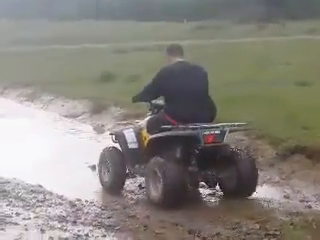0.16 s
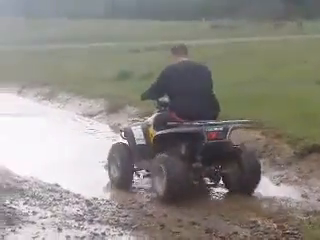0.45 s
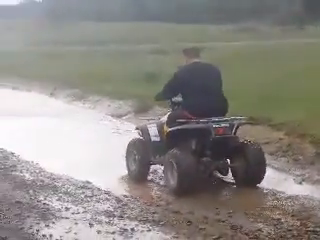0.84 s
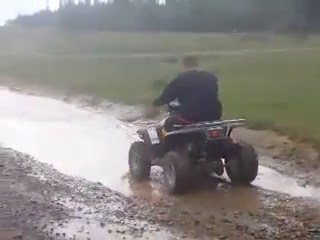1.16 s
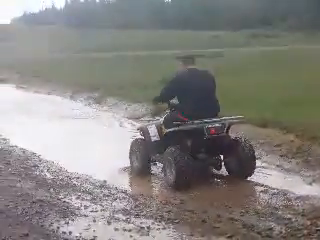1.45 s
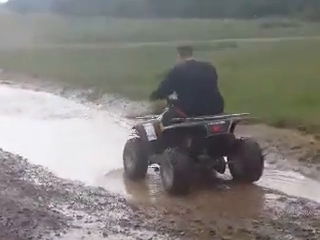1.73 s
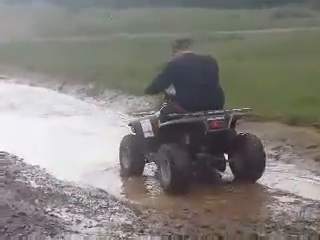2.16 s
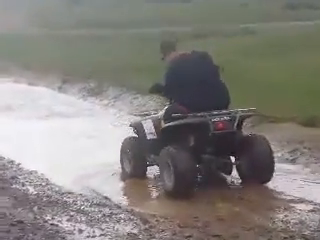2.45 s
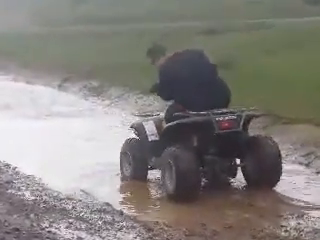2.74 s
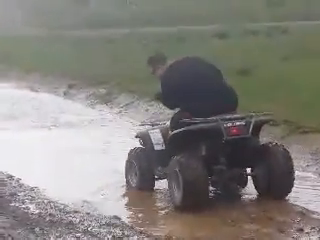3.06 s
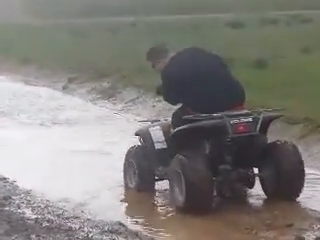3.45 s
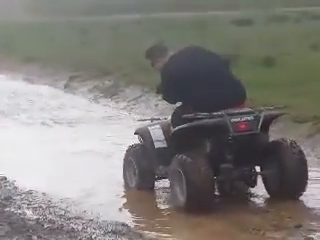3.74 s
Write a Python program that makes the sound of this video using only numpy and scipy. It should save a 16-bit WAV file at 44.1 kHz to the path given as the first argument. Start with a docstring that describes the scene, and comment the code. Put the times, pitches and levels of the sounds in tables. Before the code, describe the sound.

Small off-road engine idling close by, low exhaust pulses under bright rattling metal; it rises past a tiny splash, sags, and sputters at the end, while wind rumbles on the left microphone and gusts briefly right.

```python
"""A single-cylinder quad bike idles at the edge of a puddle: each firing sends two puffs through the muffler,
and blows of the valve gear and casing ring metal at fixed places in the cycle. Wind, as coloured noise,
buffets the left microphone port all the time and the right one in short gusts; a hollow note drifts at the left.
The engine speeds up with some hard firings, cracks of noise, and a burst of noise makes a small splash.
It drops back; a dry decaying tone ticks on the left, then three sputters crack and ring the metal."""
import sys
import numpy as np
from scipy import signal
from scipy.fft import rfft, irfft
from scipy.io import wavfile
from scipy.ndimage import uniform_filter1d

SR = 44100
rng = np.random.default_rng(int(sys.argv[2]) if len(sys.argv) > 2 else 0)


def pcm_store(signal):
    """Save signal as 16-bit PCM."""
    levels = np.round(np.clip(np.atleast_2d(signal), -1, 1) * 32767)
    wavfile.write(sys.argv[1], SR, levels.astype(np.int16).T)


N = 171990
T = np.arange(N) / SR


def amp(db):
    """Decibels to gain."""
    return 10 ** (np.asarray(db) / 20)


def unit(x):
    """Scales to an rms of one."""
    return x / np.sqrt(np.mean(x ** 2) + 1e-20)


def curve(rows, axis=1):
    """One column of a time table, interpolated at every sample."""
    rows = np.array(rows)
    return np.interp(T, rows[:, 0], rows[:, axis])


def colour(x, points, law=amp):
    """Zero-phase filter; the spectrum table is interpolated over log frequency."""
    hz, value = np.transpose(points)
    bins_hz = np.fft.rfftfreq(2 * N, 1 / SR)
    gain = law(np.interp(np.log(bins_hz + 1), np.log(hz), value))
    return irfft(rfft(x, 2 * N) * gain)[:N]


def resonate(x, hz, width_hz):
    """A fixed or moving resonance of gain one: shift to 0 Hz, one-pole lowpass, shift back."""
    turn = np.exp(2j * np.pi * np.cumsum(hz * np.ones(N)) / SR)
    pole = np.exp(-np.pi * abs(width_hz) / SR)
    smooth = signal.lfilter([1 - pole], [1, -pole], x / turn + 1e-18)
    return 2 * (turn * smooth).real


def ring(blows, modes):
    """Metal modes struck by a train of blows."""
    return sum(amp(db) * unit(resonate(blows, hz, width_hz)) for hz, width_hz, db in modes)


GRIT_SHARE = .55  # of the driving power


def wander(blows, grit, rows, width_hz):
    """A steep resonance whose pitch and level drift, struck by blows and shaken by grit."""
    hz = curve(rows)
    drive = np.sqrt(1 - GRIT_SHARE) * unit(blows) + np.sqrt(GRIT_SHARE) * unit(grit)
    note = resonate(resonate(drive, hz, width_hz), hz, width_hz)
    return amp(curve(rows, axis=2)) * unit(note)


def wobble(seconds):
    """Noise of rms one, smoothed twice over a window."""
    n = max(int(seconds * SR), 1)
    return unit(uniform_filter1d(uniform_filter1d(rng.standard_normal(N), n), n))


def add(mix, s, sound):
    """Adds a sound at a time, cut to fit."""
    at = int(round(s * SR))
    part = mix[max(at, 0):max(at + len(sound), 0)]
    part += sound[max(-at, 0):][:len(part)]


# Engine speed. Each row: time in seconds, firings per second.
ENGINE_SPEED = [(0.0, 12.943), (0.5, 13.071), (0.85, 12.44), (1.0, 13.243), (1.2, 14.596), (1.5, 15.835),
                (1.9, 16.832), (2.3, 19.19), (2.68, 21.41), (2.88, 18.116), (3.07, 17.445), (3.2, 15.515),
                (3.45, 14.029), (3.62, 12.625), (3.68, 14.916), (3.76, 20.874), (3.9, 18.19)]
START_CYCLES = .721


def cycles():
    """Engine cycles at every sample: the running integral of speed, one firing per cycle."""
    return np.cumsum(curve(ENGINE_SPEED)) / SR - START_CYCLES


def moments(share, shift=0):
    """Times at which the engine passes a place in its cycle; -1 when outside the scene."""
    return np.interp(np.arange(-1, 64) + share, cycles() - shift, T, left=-1, right=-1)


# Strength of the firings. Each row: time in seconds, relative level in dB.
FIRING_EFFORT = [(0, -6), (.9, -5), (1.2, -4), (1.8, -5), (2.6, -2.5), (2.73, -6), (2.85, -14.5),
                 (3.1, -15.5), (3.43, -10.5), (3.58, -9), (3.66, -3), (3.73, -7.5), (3.78, -5),
                 (3.84, -9.5)]


def effort_db():
    """Firing strength at every sample."""
    return curve(FIRING_EFFORT)


# Exhaust puffs of one cycle. Each row: place as a share of the cycle, relative level in dB, sigma in seconds.
EXHAUST_PUFFS = [(-.004, 0, .00068), (.146, -3.2, .00082)]
# Muffler resonances. Each row: frequency in Hz, width in Hz, relative level in dB.
MUFFLER_MODES = [(116.2, 15.7, -2.5), (177.6, 28, -19.5), (217.6, 71, -8), (266.6, 30, -12),
                 (302, 17, -16.5)]
EXHAUST_DB, FIRING_SPREAD_DB = -19, 1.36
EXHAUST_LEFT_DB, EXHAUST_LEFT_LAG_S = 1, 0.00072


def exhaust():
    """Two Gaussian puffs per firing ring the muffler."""
    t = np.arange(-256, 256) / SR
    flow = np.zeros(N)
    strength = amp(-FIRING_SPREAD_DB * rng.standard_normal(len(moments(0))))
    for share, db, sigma_s in EXHAUST_PUFFS:
        puff = -amp(db) * np.exp(-.5 * (t / sigma_s) ** 2)
        for s, size in zip(moments(share), strength):
            add(flow, s + t[0], size * puff)
    flow = flow - uniform_filter1d(flow, SR // 40)  # remove the slow mean
    flow = flow * amp(effort_db())
    muffled = sum(amp(db) * resonate(flow, hz, width_hz) for hz, width_hz, db in MUFFLER_MODES)
    right = amp(EXHAUST_DB) * unit(muffled)
    left = amp(EXHAUST_LEFT_DB) * np.interp(T - EXHAUST_LEFT_LAG_S, T, right)
    return np.array([left, right])


# Knocks of one cycle. Each row: place as a share of the cycle, shift in share per extra firing per second,
# decay in seconds, share that follows the firing strength, then relative levels in dB
# into casing, ping, rolling ring, whir and fizz.
KNOCKS = [(-.035, -.009, 0.0076, 0.75, -7, 0.5, -6, -28, 6),
          (-.022, 0.0029, 0.0065, 1, -2.5, -6, -3, 4, -9.5), (.135, 0, 0.0056, 0.4, -2, 3, -6.5, 4, -5),
          (.225, -.003, 0.0014, .1, -14.5, -6, -9, 2, -8), (.265, 0, 0.0066, 0.19, -3, -27, 0.5, 5, -0.5),
          (.345, -.003, 0.018, 0.16, -9, -7, 0, 4, -2), (.555, -.001, 0.0065, 0.69, -3, -2.5, -11, 1, -6),
          (.62, -.009, 0.024, 0.34, -13, 2, 0, 5.5, -9)]
MIDDLE_SPEED_HZ = 15  # firings per second with no shift
KNOCK_RISE_S, KNOCK_SPREAD_DB, KNOCK_JITTER_S = 0.0017, 1.2, .0005
GRAIN_DB, GRAIN_S = 1, 0.0019
SHAKE_FLOOR = .27  # steady shaking between knocks
# The clatter hushes while the piston compresses.
HUSH_PLACE, HUSH_HALF_WIDTH, HUSH_DB = .87, .07, -4  # shares of the cycle, dB


def knocks():
    """The blows, and the envelope of gritty shaking that follows them, for each ringing part."""
    t = np.arange(SR // 16) / SR
    effort = effort_db()
    faster = curve(ENGINE_SPEED) - MIDDLE_SPEED_HZ
    blows, power = np.zeros((2, 5, N))
    for share, shift, decay_s, follows, *parts_db in KNOCKS:
        times = moments(share, shift * faster)
        fall = np.exp(-np.maximum(t - KNOCK_RISE_S, 0) / decay_s)
        burst = np.minimum(t / KNOCK_RISE_S, 1) * fall
        for s, (late, hard) in zip(times, rng.standard_normal((len(times), 2))):
            at = s + KNOCK_JITTER_S * late
            change_db = KNOCK_SPREAD_DB * hard + follows * np.interp(s, T, effort)
            for part, size in enumerate(amp(np.array(parts_db) + change_db)):
                add(power[part], at, (size * burst) ** 2)
                add(blows[part], at + KNOCK_RISE_S, np.array([size]))
    hush_db = HUSH_DB * np.exp(-((cycles() % 1 - HUSH_PLACE) / HUSH_HALF_WIDTH) ** 2)
    shake = np.sqrt(power + SHAKE_FLOOR ** 2) * amp(hush_db + GRAIN_DB * wobble(GRAIN_S))
    return blows, shake


# Each row: time in seconds, relative level of the clatter in dB, relative level of its treble in dB.
CLATTER_LEVELS = [(0, 0, 0.5), (.3, 1, 1), (.6, 1, 1.5), (.9, 1.5, -2), (1.2, 1.5, -0.5), (1.5, 2.5, 1.5),
                  (1.8, 3.5, 1.5), (2.05, 1.5, 0), (2.35, 3, 3), (2.7, 3.5, 0), (2.9, 1.5, 0.5),
                  (3.1, 1.5, 1), (3.35, 1, -2.5), (3.57, -2.5, -5.5), (3.72, 0, -2.5), (3.9, 4, 2)]
# Spectra of casing and fizz. Each row: frequency in Hz, relative level in dB.
CASING_SPECTRUM = [(300, -35), (700, -8.5), (1100, -6), (1400, -5), (1700, -6.5), (1950, 5.5), (2200, -6),
                   (2500, 1), (3100, -1), (3550, -7), (4050, -6.5), (4500, -11), (4900, -8.5), (5700, -15),
                   (9000, -25.5)]
FIZZ_SPECTRUM = [(3000, -12), (5700, -19.5), (6600, -4), (7500, 0), (8700, -5.5), (10000, -9),
                 (11500, -16.5), (14500, -18)]
CASING_DB, FIZZ_DB = -28.5, -27
# Metal modes, then thin rings. Each row: frequency in Hz, width in Hz, level in dB.
METAL_MODES = [(1564, 6.7, -49), (2010, 39, -48.5), (2502, 14, -38), (2770, 8.3, -42.5), (2870, 15, -36),
               (4372, 18, -45), (4850, 27, -48.5)]
THIN_MODES = [(1971, 11, -39.5), (3862, 13.6, -40.5)]
# Each row: time in seconds, gain of the thin rings in dB.
THIN_GAIN = [(0, -20), (.6, 1), (1.1, -8), (1.7, -3.5), (2.6, 0), (3, 8.5), (3.5, 4.5), (3.9, -8)]
# Wandering rings: main ping, rolling ring, higher whir. Each row: time in seconds, pitch in Hz, level in dB.
PING_TRACK = [(0, 1990, -36), (.6, 2030, -36), (1.2, 1980, -32), (1.8, 1980, -32), (2.6, 1940, -37),
              (3, 1960, -32), (3.5, 1950, -38), (3.9, 2020, -29)]
ROLLING_TRACK = [(0, 2530, -50), (.6, 2730, -37), (1.2, 2786, -29.5), (1.55, 2750, -34), (1.85, 2860, -32),
                 (2.2, 2575, -32), (2.75, 2640, -29.5), (3, 2820, -33.5), (3.55, 2720, -35.5),
                 (3.9, 2780, -29.5)]
WHIR_TRACK = [(0, 3920, -34.5), (.25, 3940, -34.5), (.6, 3930, -35.5), (.9, 4050, -48), (1.2, 4100, -51),
              (1.42, 3900, -36), (1.9, 4070, -47), (2.5, 4000, -42), (3.1, 3900, -43), (3.55, 3780, -47),
              (3.9, 3880, -32.5)]
PING_WIDTH_HZ, ROLLING_WIDTH_HZ, WHIR_WIDTH_HZ = 190, 260, 210


def clatter():
    """Knocks locked to the cycle shake the casing and ring the metal; two paths with separate grit."""
    blows, shake = knocks()
    body = unit(amp(curve(CLATTER_LEVELS)))
    treble = unit(amp(curve(CLATTER_LEVELS, axis=2)))
    paths = []
    for grit in rng.standard_normal((2, 5, N)) * shake:
        (_, casing), ping, rolling, whir, (_, fizz) = zip(blows, grit)
        path = body * amp(CASING_DB) * unit(colour(casing, CASING_SPECTRUM))
        path += treble * amp(FIZZ_DB) * unit(colour(fizz, FIZZ_SPECTRUM))
        path += wander(*ping, PING_TRACK, PING_WIDTH_HZ)
        path += wander(*rolling, ROLLING_TRACK, ROLLING_WIDTH_HZ)
        path += wander(*whir, WHIR_TRACK, WHIR_WIDTH_HZ)
        paths.append(path)
    metal = body * ring(blows[0], METAL_MODES)
    thin = amp(curve(THIN_GAIN)) * ring(blows[3], THIN_MODES)
    return np.array([paths[0] + metal + thin, paths[1]])


# Left port against right. Each row: frequency in Hz, level in dB.
LEFT_SPECTRUM = [(500, -2), (1200, -6), (1550, -3), (2000, -8), (3000, -7), (4300, -2), (5300, -2),
                 (6300, -9), (7500, -19), (10000, -19), (11500, -38)]
# Likeness of the ports. Each row: frequency in Hz, likeness from 0 to 1.
PORT_LIKENESS = [(500, 0.4), (1300, 0.27), (2000, 0.32), (2900, 0.22), (4000, 0.35), (8000, 0.29)]
LEFT_LAG_SAMPLES = 64


def ports(right, other):
    """The left channel carries the engine metal 64 samples late, duller and partly by other paths."""
    shared = colour(right, PORT_LIKENESS, lambda c: np.clip(c, 0, 1))
    separate = colour(other, PORT_LIKENESS, lambda c: np.sqrt(1 - np.clip(c, 0, 1) ** 2))
    left = colour(shared + separate, LEFT_SPECTRUM)
    return np.array([np.pad(left, (LEFT_LAG_SAMPLES, 0))[:N], right])


# Wind on the left port. Each row: time in seconds, level in dB.
LEFT_WIND = [(0, -11.5), (.17, -12), (.35, -12), (.6, -12.5), (.9, -16), (1.1, -14.5), (1.4, -15),
             (1.8, -16.5), (2.2, -13.5), (2.64, -17.5), (2.7, -9), (3.2, -10), (3.35, -12), (3.55, -9.5),
             (3.72, -14), (3.9, -10)]
# Gusts on the right port. Each row: centre in seconds, half length in seconds, level in dB.
RIGHT_GUSTS = [(0.017, 0.0045, -12.5), (0.319, 0.062, -19), (0.458, .03, -23), (0.55, 0.03, -17.5),
               (1.033, 0.031, -20.5), (1.12, 0.0046, -12.5), (2.754, 0.039, -26), (3.104, 0.054, -27),
               (3.25, 0.054, -12)]
# Spectra of buffeting and brighter flutter. Each row: frequency in Hz, relative level in dB.
BUFFET_SPECTRUM = [(20, -24.5), (45, -10), (80, -0.5), (160, 0.5), (260, -5), (400, -14), (600, -25),
                   (1000, -32), (1600, -41), (4000, -77)]
FLUTTER_SPECTRUM = [(120, -27), (300, 2.5), (480, 1.5), (750, -7), (1200, -28.5), (3000, -81)]
RIGHT_CALM_DB = -30
LUMP_DB, LUMP_S = 1, 0.016
FLUTTER_DB, FLUTTER_EXPONENT = -10.5, 1.37  # flutter grows faster than the wind
FLUTTER_LUMP_DB, FLUTTER_LUMP_S = 3.9, 0.0053


def wind():
    """Lumpy turbulence, unrelated at the two ports, brighter when it blows harder."""
    gusts = sum(amp(db) * np.exp(-((T - s) / half_s) ** 2) for s, half_s, db in RIGHT_GUSTS)
    out = []
    for level in amp(curve(LEFT_WIND)), amp(RIGHT_CALM_DB) + gusts:
        low, high = rng.standard_normal((2, N)) * amp(LUMP_DB * wobble(LUMP_S))
        buffet = unit(colour(low, BUFFET_SPECTRUM))
        lumpy = high * amp(FLUTTER_LUMP_DB * wobble(FLUTTER_LUMP_S))
        flutter = unit(colour(lumpy, FLUTTER_SPECTRUM))
        out.append(level * buffet + amp(FLUTTER_DB) * level ** FLUTTER_EXPONENT * flutter)
    return np.array(out)


# Drifting note in the left wind. Each row: time in seconds, pitch in Hz, level in dB.
HOLLOW_TRACK = [(0, 157, -23), (.3, 149, -25), (.7, 148, -38), (2.6, 130, -31), (2.75, 136, -18),
                (2.95, 165, -17), (3.12, 157, -14), (3.33, 108, -19.5), (3.52, 156, -17), (3.7, 153, -21),
                (3.9, 170, -18)]
HOLLOW_WIDTH_HZ = 40


def hollow():
    """Turbulence through a drifting resonance, left only."""
    hz = curve(HOLLOW_TRACK)
    once = resonate(rng.standard_normal(N), hz, HOLLOW_WIDTH_HZ)
    note = resonate(once, hz, HOLLOW_WIDTH_HZ)
    return np.array([amp(curve(HOLLOW_TRACK, axis=2)) * unit(note), np.zeros(N)])


# A few under throttle, then three sputters. Each row: start in seconds, level in dB, crack length in seconds.
HARD_FIRINGS = [(.829, -23, .002), (.986, -21.5, .002), (1.0592, -19.5, 0.0026), (1.1315, -20, .002),
                (1.2, -23, 0.0025), (1.715, -23, .002), (3.6625, -11, 0.0043), (3.7227, -10.5, 0.0046),
                (3.7753, -11.5, .003)]
# Crack spectrum. Each row: frequency in Hz, relative level in dB.
CRACK_SPECTRUM = [(300, 15), (900, 3), (1400, 2), (2050, 17), (2400, 5), (2950, 15), (3800, 1.5),
                  (4900, -3.5), (5700, -10), (7200, 7.5), (10000, -6), (14000, -12)]
# Modes struck by the hard firings. Each row: frequency in Hz, width in Hz, level in dB.
CLANK_MODES = [(1890, 70, -51), (2080, 110, -56), (2730, 47, -72), (3020, 180, -61), (3910, 60, -51),
               (4480, 74, -62), (4790, 83, -49), (6900, 90, -54), (7200, 82, -58)]
CRACK_RISE_S, CRACK_DECAY_S = 0.0015, 0.004
CRACK_TAIL_SHARE, CRACK_TAIL_S = 0.12, 0.025


def sputters():
    """Hard firings crack through the casing as noise bursts and leave it ringing."""
    t = np.arange(SR // 8) / SR
    level, blows = np.zeros((2, N))
    for s, db, length_s in HARD_FIRINGS:
        after = np.maximum(t - CRACK_RISE_S - length_s, 0)
        fall = np.exp(-after / CRACK_DECAY_S) + CRACK_TAIL_SHARE * np.exp(-after / CRACK_TAIL_S)
        add(level, s, amp(db) * np.minimum(t / CRACK_RISE_S, 1) * fall)
        add(blows, s + CRACK_RISE_S, amp([db]))
    near, far = [level * unit(colour(z, CRACK_SPECTRUM)) for z in rng.standard_normal((2, N))]
    return np.array([near + ring(blows, CLANK_MODES), far])


# Splash spectrum. Each row: frequency in Hz, relative level in dB.
SPLASH_SPECTRUM = [(300, -7), (700, 12), (1100, 14), (1600, 0), (4000, -38)]
SPLASH_START_S, SPLASH_DB, SPLASH_DECAY_S = 1.668, -20, 0.014


def splash():
    """A short slap of water: decaying coloured noise, separate at each port."""
    decay = np.exp(-abs(T - SPLASH_START_S) / SPLASH_DECAY_S)
    level = amp(SPLASH_DB) * (T > SPLASH_START_S) * decay
    return np.array([level * unit(colour(z, SPLASH_SPECTRUM)) for z in rng.standard_normal((2, N))])


TICK_CENTRE_S, TICK_DB, TICK_DECAY_S, TICK_HZ = 3.646, 0, 0.000083, 3800


def tick():
    """One tiny dry tick on the left: a cosine under a two-sided exponential."""
    t = T - TICK_CENTRE_S
    left = amp(TICK_DB) * np.exp(-abs(t) / TICK_DECAY_S) * np.cos(2 * np.pi * TICK_HZ * t)
    return np.array([left, np.zeros(N)])


def scene():
    """Engine, wind and water at the two ports."""
    engine = exhaust() + ports(*(clatter() + sputters()))
    return engine + wind() + hollow() + splash() + tick()


EDGE_HZ = 14400


def record(dry):
    """Peaks are rounded off near full scale; then a lowpass sets the band limit."""
    held = dry / (1 + abs(dry) ** 8) ** (1 / 8)
    lowpass = signal.firwin(255, EDGE_HZ, window=("kaiser", 9), fs=SR)
    return signal.oaconvolve(held, lowpass[None], "same")


dry = scene()
out = record(dry)
pcm_store(out)
```